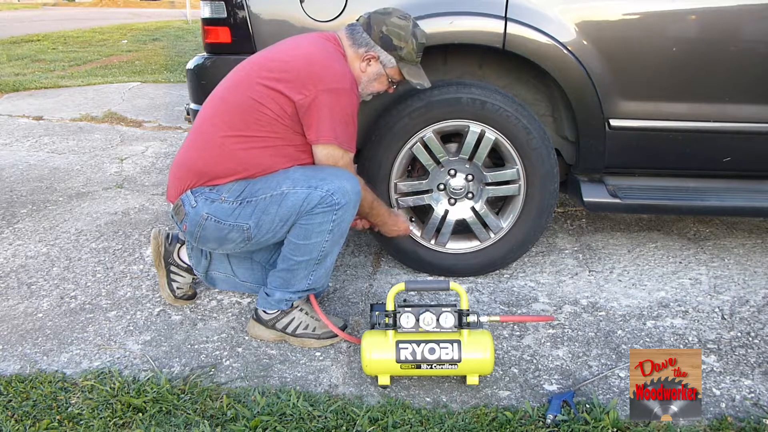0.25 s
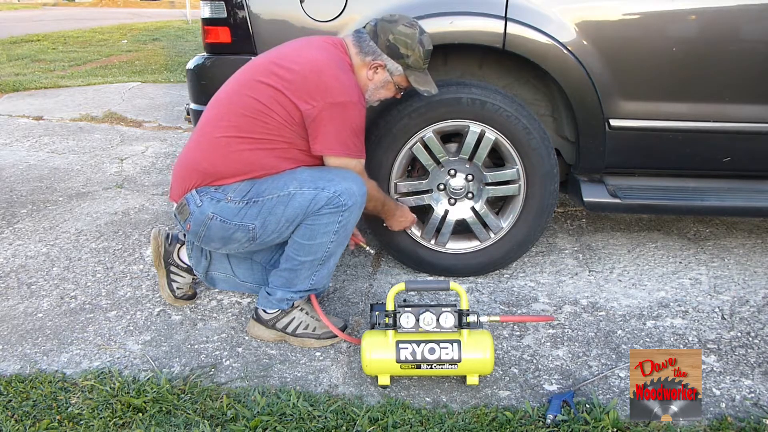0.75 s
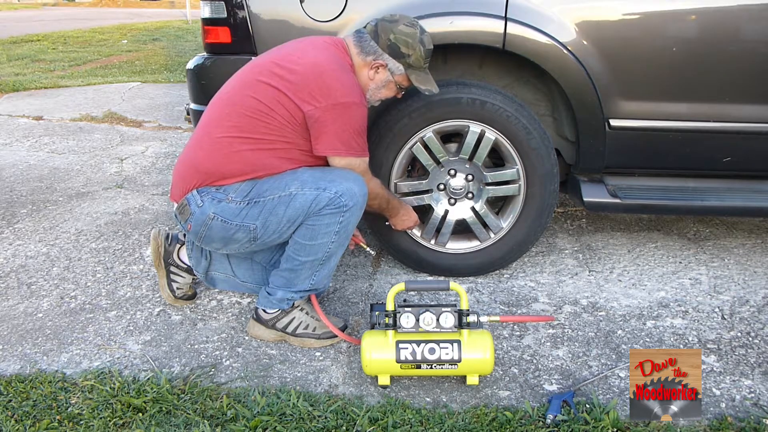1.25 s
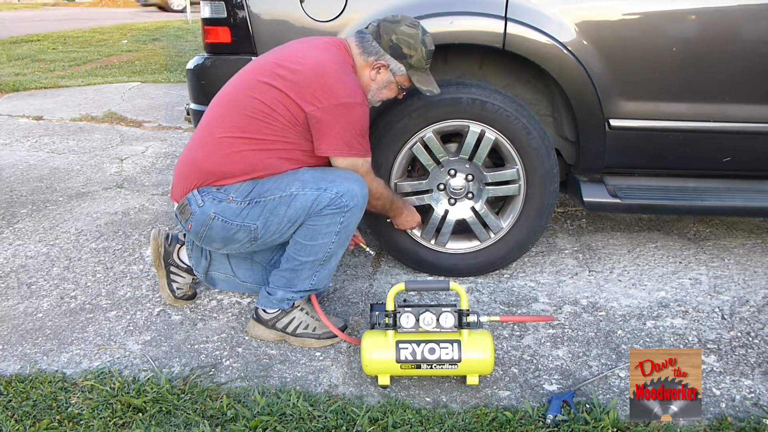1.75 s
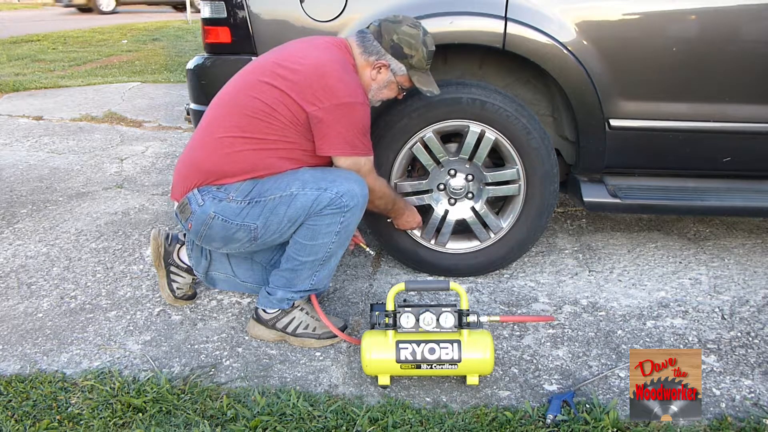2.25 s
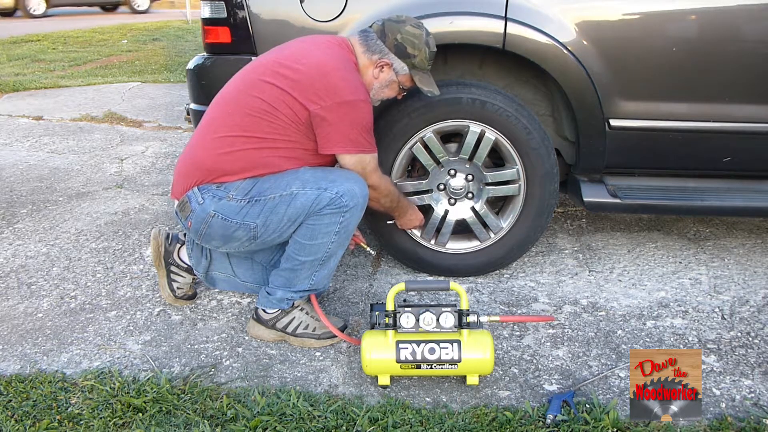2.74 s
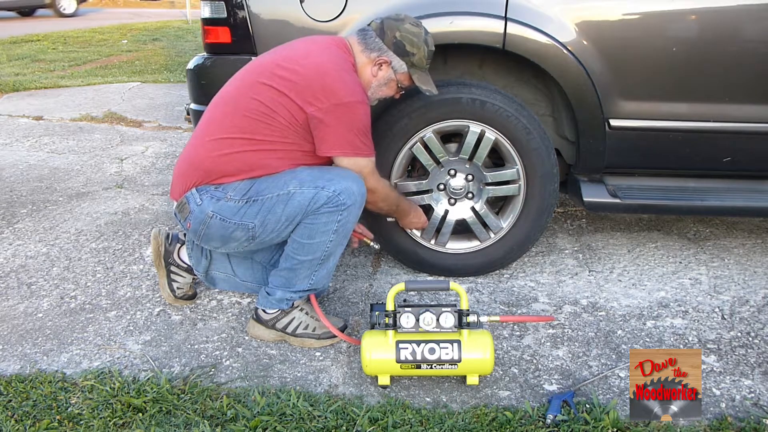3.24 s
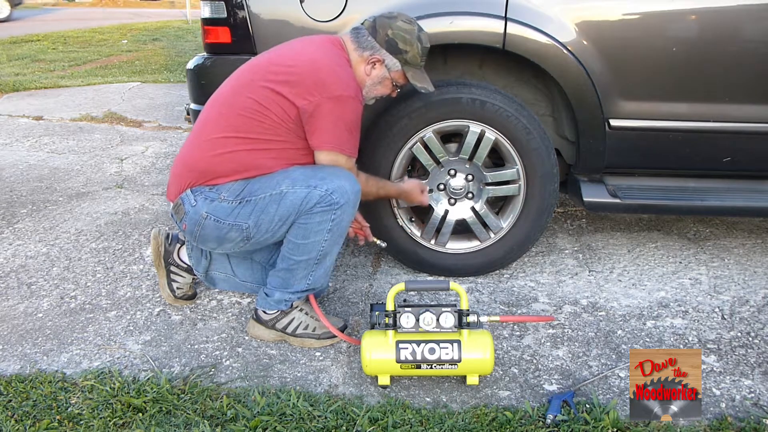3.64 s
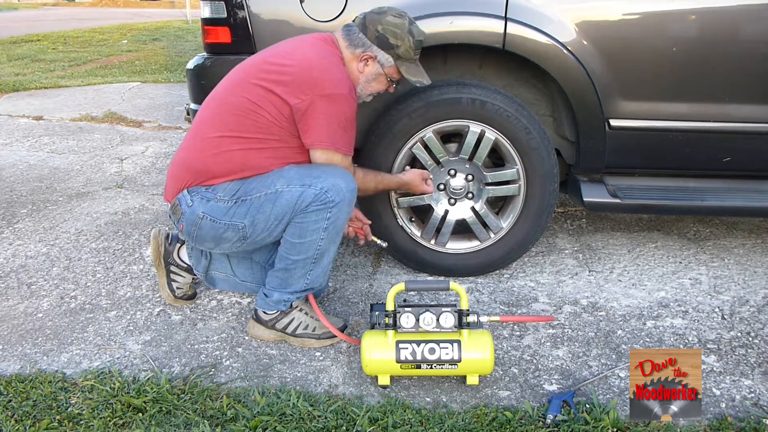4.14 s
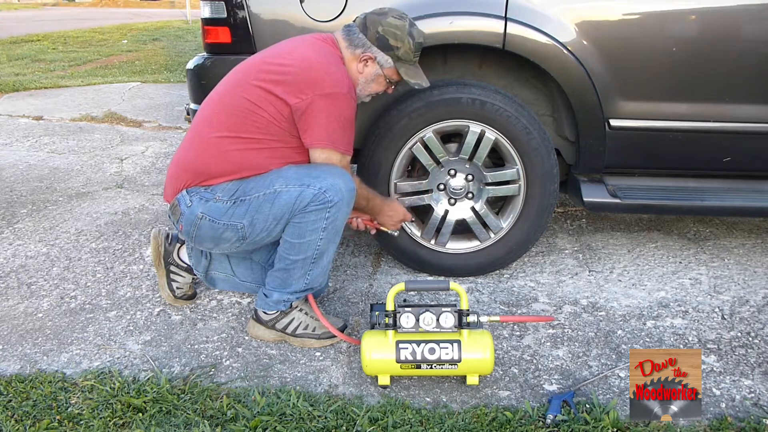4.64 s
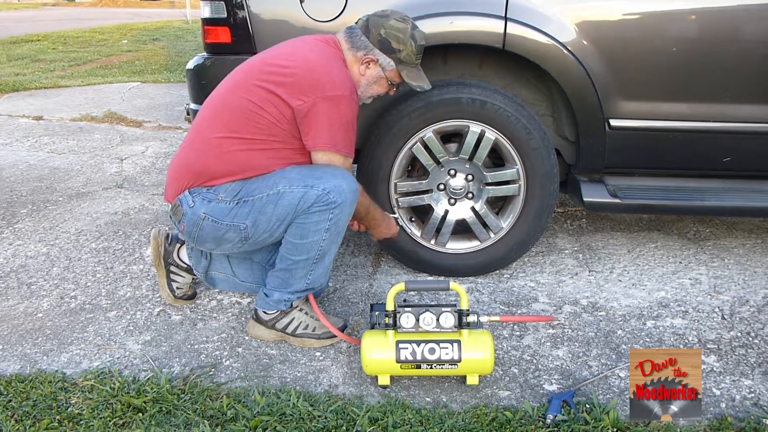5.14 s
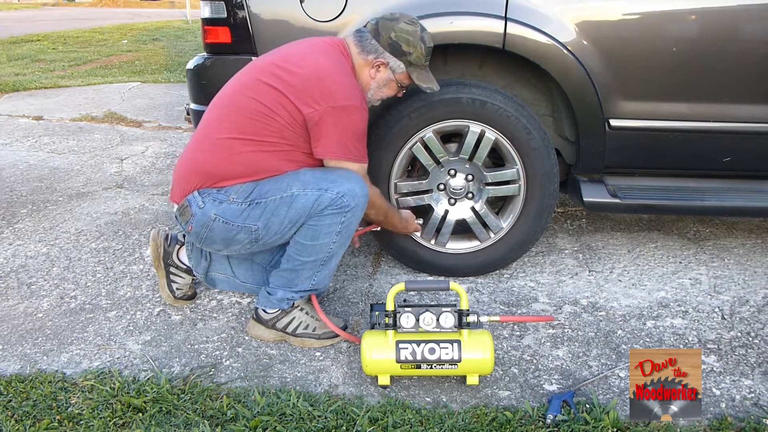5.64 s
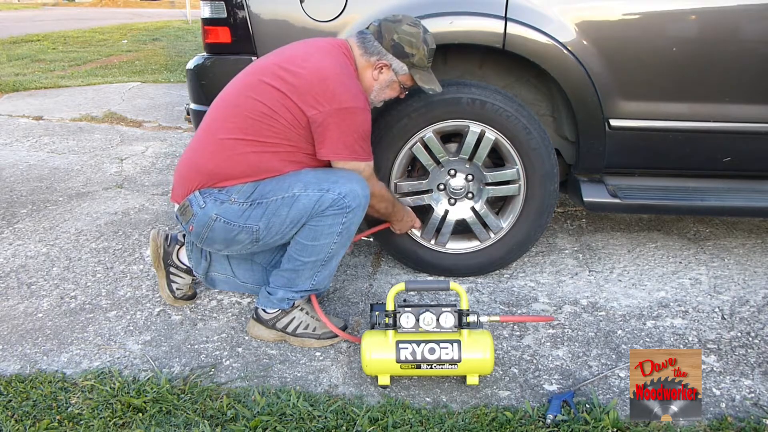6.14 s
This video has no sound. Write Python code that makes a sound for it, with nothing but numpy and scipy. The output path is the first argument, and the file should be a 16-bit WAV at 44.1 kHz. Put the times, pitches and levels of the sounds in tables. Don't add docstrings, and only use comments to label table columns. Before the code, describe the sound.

From 0 to about 6.4 seconds a small battery piston compressor runs continuously, close to the microphone on a driveway beside a car. About 86 strokes per second make a hard, steady buzz, strongest near 430 hertz, with higher orders, thin gear whine and pulsing airy valve rustle. It eases slightly in level during the first second, and pitch sags barely perceptibly as the tank fills, while the whine swells and fades and the casing's ring changes. At 2.06 the chuck slips: bright hiss and ragged spits, strongest around 2.2 to 2.35, trailing into short sputters until about 2.75. The drone dips a couple of decibels, then recovers. A faint spit at 3.1 leads to one sharp, very short puff at 3.15, with another small dip. Two barely audible puffs come near 5.7 and 5.8. Ground and wheel reflections add width; faint open air sits behind. The motor is still running at the end.

```python
import sys
import numpy as np
from scipy import signal
from scipy.fft import rfft, irfft, next_fast_len
from scipy.io import wavfile
from scipy.ndimage import uniform_filter1d, map_coordinates

SR = 44100
rng = np.random.default_rng(int(sys.argv[2]) if len(sys.argv) > 2 else 0)


def volts_from_db(level):
    exponent = np.asarray(level, float) / 20
    return 10 ** exponent


def persist_wave(psi):
    counts = np.round(np.clip(psi, -1, 1) * 32767).astype(np.int16)
    wavfile.write(sys.argv[1], SR, np.atleast_2d(counts).T)


N = 281358

FREE_TURNS_PER_S = 85.97
# (time [s], share of the rise [0-1, may pass 1])
TANK_FILLING = [(0, 0.), (1.5, 0.17), (3, 0.44), (4.5, 0.85), (6.38, 1.08)]


def rms_one(x):
    return x / np.sqrt(np.mean(x ** 2) + 1e-20)


def filter_sos(x, order, hz, kind):
    return signal.sosfilt(signal.butter(order, hz, kind, fs=SR, output="sos"), x)


def at_hz(points, hz):
    point_hz, point_value = np.array(points).T
    return np.interp(np.log(hz + 1), np.log(point_hz), point_value)


def colour(x, gain_db_at, turn_at=lambda hz: 0):
    size = next_fast_len(N)
    hz = np.arange(size // 2 + 1) * SR / size
    response = volts_from_db(gain_db_at(hz)) * np.exp(1j * turn_at(hz))
    return irfft(rfft(x, size) * response, size)[..., :N]


def noise(points):
    return rms_one(colour(rng.standard_normal(N), lambda hz: at_hz(points, hz)))


def wander(shape, keep):
    keep = np.clip(keep, 0, .999)
    steps = rng.standard_normal(shape) + 1j * rng.standard_normal(shape)
    start = keep * steps[:1] / np.sqrt(1 - keep ** 2)
    walk = signal.lfilter([1], [1, -keep], steps, axis=0, zi=start)[0]
    return walk * np.sqrt((1 - keep ** 2) / 2)


def burst(s, start, hold, rise, fall):
    after = np.maximum(s - start, 0)
    return (1 - np.exp(-after / rise)) * np.exp(-np.maximum(after - hold, 0) / fall)


def tank_share(s):
    at, share = np.transpose(TANK_FILLING)
    return np.interp(s, at, share)


def crank_turns(s):
    sag_turns_per_s, sag_s, first_stroke_s = 1.18, 8.0, .00054
    speed = FREE_TURNS_PER_S - sag_turns_per_s * (1 - np.exp(-s / sag_s))
    return np.cumsum(speed) / SR - first_stroke_s * FREE_TURNS_PER_S + 2


def casing_db(hz, full, mottle):
    # (centre [Hz], width [Hz], level with tank low [dB], level with tank full [dB])
    resonances = [(464.3, 2.8, 12, 13.5), (1075, 5.8, 4, 16), (1213, 27, 10.5, 13.5), (1760, 80, 1, -0.5),
                  (2160, 22, 3, 11), (3560, 450, -3, 3), (4500, 116, -11, -5), (5200, 240, -1, 3.5),
                  (5900, 150, 1, 0), (7370, 170, -5, -2.5), (7730, 240, 2.5, 3), (9150, 98, -6, -9),
                  (11400, 230, 0.5, 2), (14900, 410, 3, 5.5)]
    mottle_db, mottle_from_hz = 3.5, 5500
    low, filled = [np.interp(hz, 130 * np.arange(len(m)), m) for m in mottle]
    total_db = mottle_db * (low + (filled - low) * full) * np.clip(hz / mottle_from_hz - 1, 0, 1)
    for centre_hz, width_hz, low_db, full_db in resonances:
        bump = np.exp(-.5 * ((hz - centre_hz) / width_hz) ** 2)
        total_db = total_db + (low_db + (full_db - low_db) * full) * bump
    return total_db


def whine_db(full):
    # (tank share at the peak, width before [share], width after [share], peak [dB], floor [dB])
    resonance_passes = [(0.18, 0.02, 0.088, -16.5, -26.5), (0.21, 0.093, 0.4, -13, -51),
                        (.03, .05, .06, -25, -34), (0.23, 0.11, 0.23, -21.5, -55)]
    levels_db = []
    for at, before, after, peak_db, floor_db in resonance_passes:
        offset = (full - at) / np.where(full < at, before, after)
        peak_power = volts_from_db(peak_db) ** 2 / (1 + offset ** 2)
        floor_power = volts_from_db(floor_db - 7.3 * full) ** 2
        levels_db.append(10 * np.log10(peak_power + floor_power))
    return levels_db


def timing(order, scatter):
    contacts = [(.051, .82), (.089, .48), (.507, .49), (.887, .96), (.931, .88)]
    knocks = sum(strength * np.exp(-2j * np.pi * order * place) for place, strength in contacts)
    steady = np.pi if order % 1 else np.angle(knocks)
    return steady + scatter * max(order - 16, 0) * rng.standard_normal()


def drone(turns, s, mottle, flutter, scatter):
    # (multiple of the crank rate, level with tank low [dB], level with tank full [dB])
    strong_orders = [(1.0, -37, -37), (2.0, -18, -18), (3.0, -19, -20), (3.5, -27, -29), (4.0, -10, -11),
                     (5.0, 0, 0), (5.5, -18, -22), (6.5, -27, -28), (7.0, -6, -7), (8.0, -8, -9),
                     (9.0, -11, -16), (10.0, -17, -20), (11.0, -20, -19), (12.0, -17, -19),
                     (13.0, -25, -26), (14.0, -10, -17), (15.0, -29, -28), (16.0, -27, -22),
                     (17.0, -34, -32), (18.0, -38, -24), (19.0, -36, -33), (23.0, -34, -31),
                     (25.0, -30, -41), (37.0, -42, -29), (38.0, -48, -28), (39.0, -38, -31),
                     (40.0, -32, -35), (42.0, -42, -32), (45.0, -46, -30), (49.0, -32, -31)]
    whine_orders = [35, 36, 47, 48]
    # (frequency [Hz], level [dB])
    every_stroke = [(400, -36), (1600, -39), (3500, -38), (5200, -43), (7000, -44), (9300, -49),
                    (12000, -57), (15400, -66)]
    # (frequency [Hz], level [dB])
    second_stroke = [(170, -52), (400, -37), (650, -44), (1000, -42), (1600, -48), (2200, -48), (4000, -48),
                     (7000, -57), (14000, -70)]
    pairs, size, top = int(turns[-1] / 2) + 3, 6144, 372
    when = np.interp(2 * np.arange(pairs), turns, s)
    half = np.arange(top)
    hz = half * FREE_TURNS_PER_S / 2
    full = tank_share(when)

    weak_db = np.where(half % 2, at_hz(second_stroke, hz), at_hz(every_stroke, hz))
    weak_db = weak_db + casing_db(hz, full[:, None], mottle)
    lines = volts_from_db(weak_db + 0.54) * wander((pairs, top), keep=0.95) * (half > 3)

    strong = [(order, low_db + (full_db - low_db) * full) for order, low_db, full_db in strong_orders]
    strong += zip(whine_orders, whine_db(full))
    for order, level_db in strong:
        lines[:, round(2 * order)] = volts_from_db(level_db) * np.exp(1j * timing(order, scatter))
    lines = lines * (1 + flutter * (1 + hz / 1500) * wander((pairs, top), keep=0.12))

    waves = irfft(lines, size) * size / np.sqrt(2)
    wrapped = np.concatenate([waves, waves[:, :1]], axis=1)
    place = (turns / 2) % 1
    return map_coordinates(wrapped, [turns / 2, place * size], order=1)


def rustle(turns, s, mottle, pulse_db):
    # (frequency [Hz], level per half order [dB])
    valve_noise = [(270.0, -39), (440.0, -34), (690.0, -36), (1080.0, -38), (1610.0, -45), (2160.0, -49),
                   (2920.0, -46.5), (3920.0, -44), (5190.0, -48), (6980.0, -50), (9330.0, -53),
                   (11920.0, -57), (14100.0, -60), (15440.0, -73)]
    bin_db = 10 * np.log10(SR / FREE_TURNS_PER_S)
    white, full = rng.standard_normal(N), tank_share(s)

    def through_casing(share):
        return colour(white, lambda hz: bin_db - 0.84 + at_hz(valve_noise, hz) + casing_db(hz, share, mottle))

    low, filled = through_casing(0), through_casing(1)
    body = filter_sos(low + (filled - low) * full, 3, 140, "high")
    high = filter_sos(body, 2, 1600, "high")
    beat = np.cos(2 * np.pi * turns) + 0.73 * np.cos(6 * np.pi * turns)
    return body + high * (volts_from_db(pulse_db * beat) - 1)


def hum_db(s):
    # (time [s], hold [s], depth [dB])
    ducks = [
        (.95, 0.15, 0.1),
        (2.082, .42, 2.5),
        (3.13, .06, 1.5),
        (5.62, .08, 0.15),
    ]
    start_db, tire_db, tire_s = -29, 1.05, 1
    attack_s, release_s = 0.016, 0.38
    ducked = sum(depth_db * burst(s, at, hold, attack_s, release_s) for at, hold, depth_db in ducks)
    return start_db - tire_db * (1 - np.exp(-s / tire_s)) - ducked


def open_air():
    # (frequency [Hz], level per Hz [dB])
    air_spectrum = [(20, -5), (50, -6), (125, -4), (170, 6), (300, 3), (700, -4), (1500, -20), (4000, -40),
                    (16000, -60)]
    return volts_from_db(-65) * (noise(air_spectrum) + 0.73 * noise(air_spectrum) * [[1], [-1]])


def spatter(points, ragged_db):
    body, out = noise(points), 0
    edges = 1000 * 2 ** np.arange(0, 4.1, .5)
    rough = rms_one(filter_sos(rng.standard_normal((len(edges), N)), 2, 50, "low"))
    for low, high, own in zip(edges, edges[1:], rough[1:]):
        sputter = volts_from_db(ragged_db * (0.47 * rough[0] + 0.82 * own))
        out = -out + sputter * filter_sos(body, 2, [low, high], "band")
    return rms_one(out)


def escape(s, ragged_db):
    # (time [s], length [s], thin hiss [dB], broad sputter [dB])
    spits = [
        (2.063, 0.06, -49.5, -49),
        (2.127, .1, -52, -53),
        (2.227, 0.05, -48.5, -47),
        (2.281, 0.066, -49, -44.5),
        (2.368, 0.11, -55, -56),
        (2.445, 0.036, -57, -57),
        (2.5, .16, -64, -57),
        (2.583, 0.031, -74, -52),
        (2.707, .03, -60, -52),
        (3.085, .05, -67, -61),
    ]
    # (time [s], level [dB], half length [s])
    puffs = [
        (3.155, -34, 0.0075),
        (5.68, -62, .015),
        (5.805, -63, .010),
    ]
    # (frequency [Hz], level per Hz [dB])
    thin_spectrum = [(3000, -22), (5000, -15), (8000, -10), (11000, -8), (15000, -4.5)]
    broad_spectrum = [(1000, -8), (1500, -2.5), (2200, -5), (3000, 0), (4200, 0), (4700, -4), (5400, -5),
                      (12000, -15.5)]
    puff_spectrum = [(1000, -15), (1900, 0), (2800, -1), (4200, 3), (5200, -6), (5470, 8), (5750, -8),
                     (9400, 0), (12000, -2), (15000, -4)]
    thin, broad = 0, 0
    for at, length, thin_db, broad_db in spits:
        envelope = burst(s, at, length, rise=0.017, fall=0.021)
        thin = thin + volts_from_db(thin_db) * envelope
        broad = broad + volts_from_db(broad_db) * envelope
    leak = thin * spatter(thin_spectrum, ragged_db) + broad * spatter(broad_spectrum, ragged_db)
    swell = sum(volts_from_db(db) * np.exp(-np.abs((s - at) / half) ** 0.97) for at, db, half in puffs)
    return leak + swell * noise(puff_spectrum)


def two_capsules(centre):
    # (frequency [Hz], left minus right [dB])
    lean = [(600, 0), (800, -.5), (1000, -1.2), (1200, -3), (1500, -4.3), (2200, -3.3), (4000, -2.6),
            (5000, -1.2), (8000, -2.2), (14000, -2.5)]
    # (frequency [Hz], phase the left capsule leads by [rad])
    lead = [(450, 0), (600, -.11), (700, -.07), (1030, -.17), (1250, -.15), (1550, .1), (3100, .15),
            (6000, .05)]
    ripple_db = 1.2 * rng.standard_normal(160)

    def tip_db(hz):
        ripple = np.interp(hz, 100 * np.arange(160), ripple_db)
        return at_hz(lean, hz) + ripple * np.clip(hz / 1500 - .5, 0, 1)

    return np.array([colour(centre, lambda hz: side * tip_db(hz) / 2, lambda hz: side * at_hz(lead, hz) / 2)
                     for side in (1, -1)])


def scene():
    s = np.arange(N) / SR
    turns = crank_turns(s)
    level = volts_from_db(hum_db(s))
    mottle = rng.standard_normal((2, 125))
    compressor = drone(turns, s, mottle, flutter=0.028, scatter=0.304) + rustle(turns, s, mottle, pulse_db=3.5)
    leak = escape(s, ragged_db=2.0)
    ears = two_capsules(level * compressor + leak)
    scattered = filter_sos(rustle(turns, s, mottle, pulse_db=2.5), 1, 1500, "high")
    ears = ears + volts_from_db(-9.5) * level * scattered * [[1], [-1]]
    ears = ears + volts_from_db(-13) * np.roll(leak, 400) * [[1], [-1]]
    return ears + open_air()


def starve(x):
    # (frequency [Hz], threshold [dB])
    starved = [(3500, -30), (5000, -9), (9000, -4.5), (14000, -1.5)]
    width_lost_hz, width_kept = 6700, .42
    top_lost_hz = 15150
    hz, _, cells = signal.stft(x, SR, nperseg=2048)
    power = np.mean(np.abs(cells) ** 2, axis=0)
    row_hz = hz[:, None]
    patch = uniform_filter1d(power, size=4, axis=0)
    band = uniform_filter1d(power, size=48, axis=0)
    kept = (patch > band * volts_from_db(at_hz(starved, hz))[:, None] ** 2) | (row_hz < starved[0][0])

    treble = power[hz > width_lost_hz].sum(axis=0)
    loud = treble > 1.5 * np.median(treble)
    kept &= (row_hz < top_lost_hz) | loud

    chance = np.repeat(rng.random(len(treble)), 2)[:len(treble)]
    wide = (chance < width_kept + 3 * (patch > 2 * band)) | loud
    mid, side = cells.mean(axis=0), (cells[0] - cells[1]) / 2
    side = side * np.where(row_hz > width_lost_hz, wide * volts_from_db(-1.0), 1)
    return signal.istft(np.array([mid + side, mid - side]) * kept, SR, nperseg=2048)[1][:, :N]


def top_cut(x):
    return signal.sosfilt(signal.butter(12, 15880, fs=SR, output="sos"), x)


def record(dry):
    steep_top_hz = 15400
    cut = signal.sosfilt(signal.cheby2(20, 50, steep_top_hz + 300, fs=SR, output="sos"), dry)
    mix = starve(cut)
    return top_cut(mix)


dry = scene()
out = record(dry)
persist_wave(out)
```